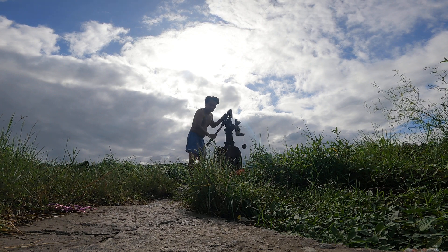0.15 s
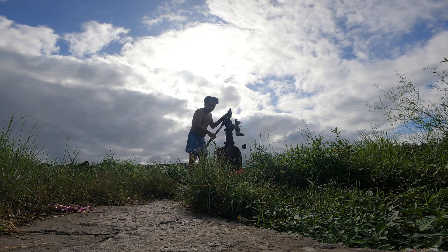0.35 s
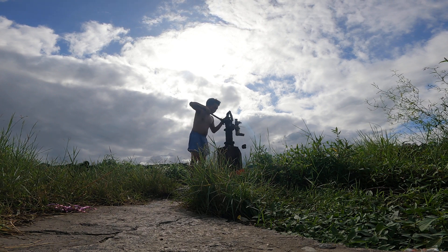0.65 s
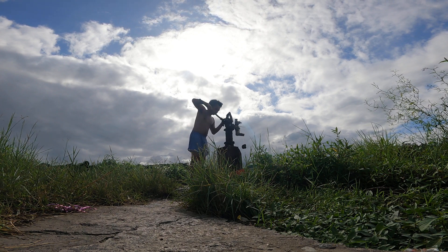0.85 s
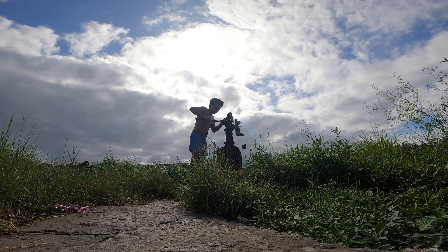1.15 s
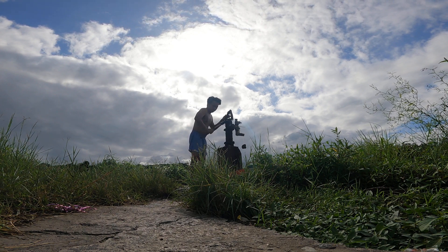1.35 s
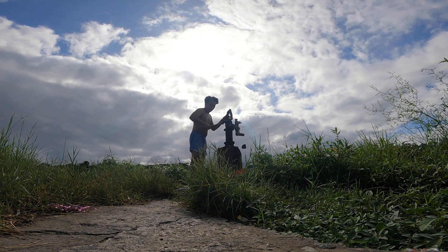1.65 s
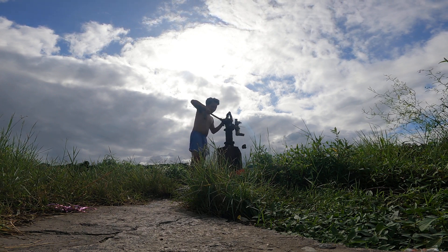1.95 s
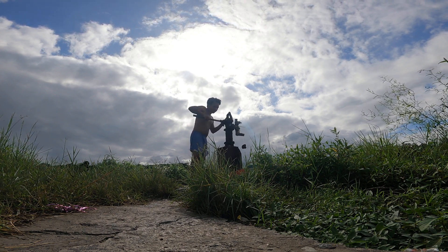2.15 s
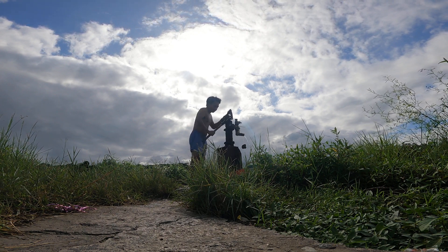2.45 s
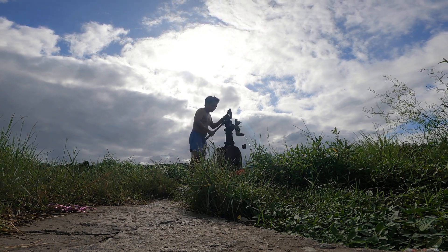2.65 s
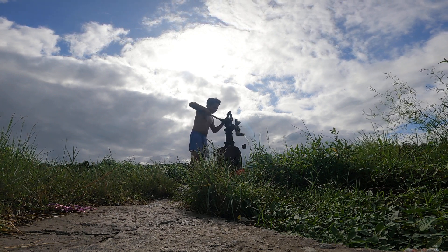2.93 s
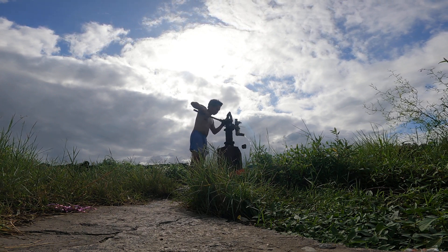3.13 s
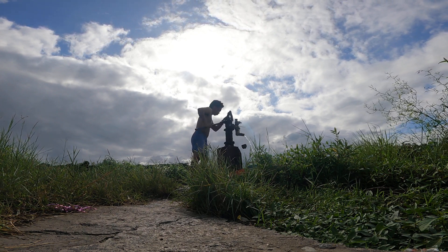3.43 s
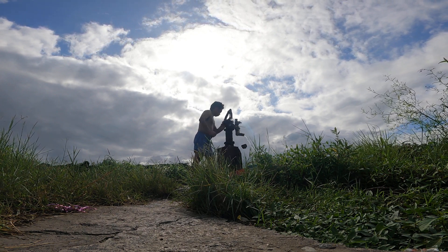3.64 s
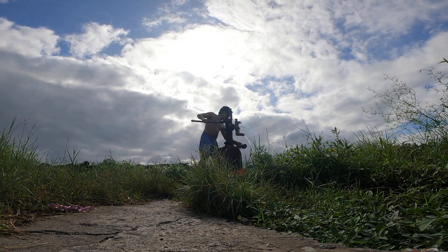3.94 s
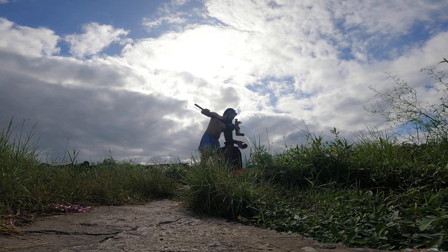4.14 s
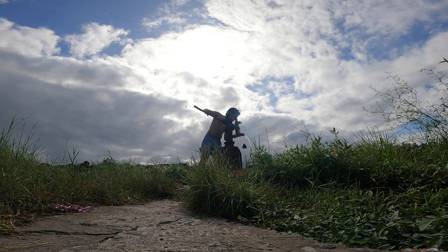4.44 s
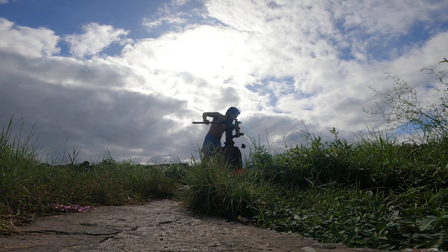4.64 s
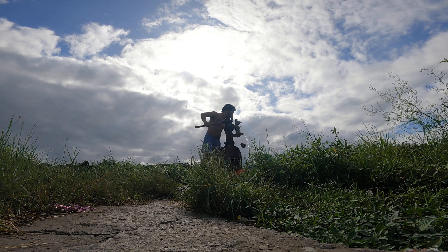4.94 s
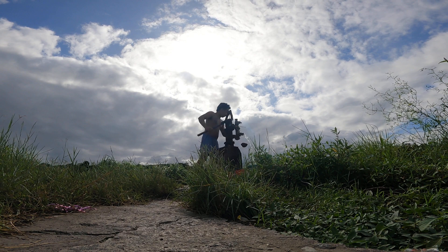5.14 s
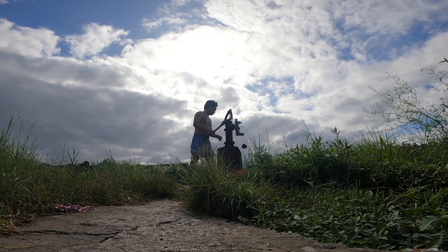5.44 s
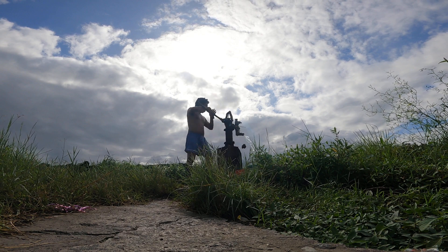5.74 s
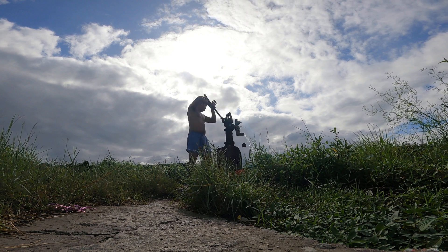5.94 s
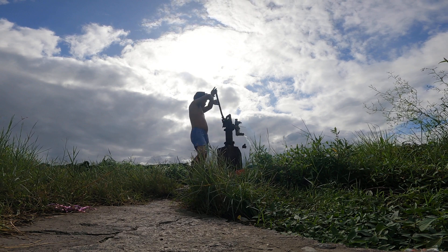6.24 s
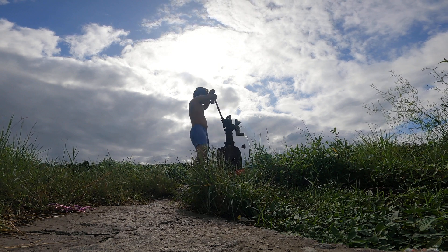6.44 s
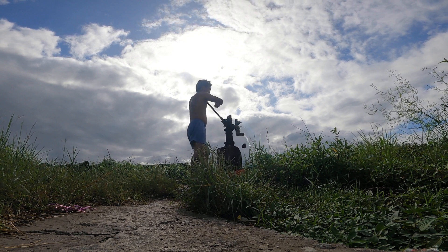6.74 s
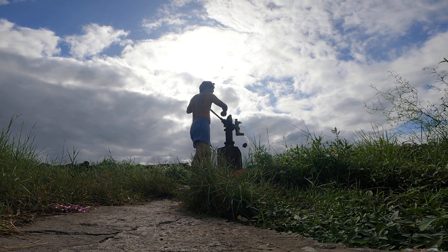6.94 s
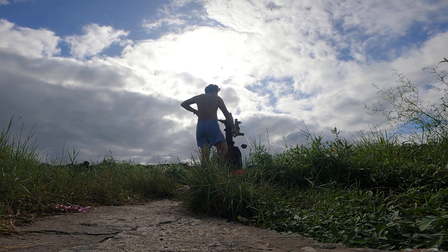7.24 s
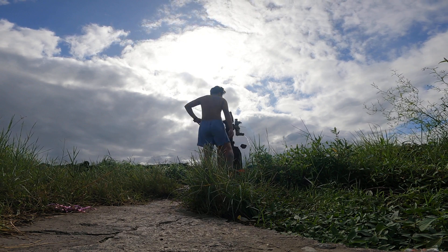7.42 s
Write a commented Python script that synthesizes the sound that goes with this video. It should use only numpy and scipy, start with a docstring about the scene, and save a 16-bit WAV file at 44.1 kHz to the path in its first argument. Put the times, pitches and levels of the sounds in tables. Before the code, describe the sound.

Metal knocks and short squeals from a hand pump lever, with hollow gulps, splashing water and a soft wind rumble.

```python
"""A worn cast-iron hand pump is worked in an open field, a few metres away, in a light rumbling wind.
From the first stroke its loose pivots knock, grind and squeal, and trapped air gulps in the barrel.
As the pump primes, water pours from the spout and splashes below; the biggest gulps come after 5 s.
The lever rests at about 7 s; the water runs on under one thin high chirp, like a small bird or insect."""
import sys
import numpy as np
from scipy import signal
from scipy.fft import rfft, irfft
from scipy.io import wavfile
from scipy.ndimage import uniform_filter1d

SR = 44100
rng = np.random.default_rng(int(sys.argv[2]) if len(sys.argv) > 2 else 0)


def bounce(signal):
    """Save signal as a 16-bit WAV file at the path given by the first command-line argument."""
    frames = np.transpose(np.atleast_2d(signal))
    limited = np.clip(frames, -1, 1)
    pcm = np.round(limited * 32767).astype(np.int16)
    wavfile.write(sys.argv[1], SR, pcm)


N = 334278
TIME, BINS = np.arange(N) / SR, np.fft.rfftfreq(N, 1 / SR)


# Hits of the lever and rod: start_s, level_db, chatter_t60_s
KNOCK_HITS = [(0.345, -17.5, 0.18), (0.35, -10, 0.059), (0.5987, -16, 0.071), (0.621, -11.5, 0.093),
              (0.6727, -12.5, .04), (0.7062, -18.5, 0.09), (1.1612, -7.5, 0.05), (1.1804, -20, 0.063),
              (1.2084, -16, .045), (1.6138, -12.5, 0.072), (1.624, -10, 0.066), (1.752, -20, 0.031),
              (1.7667, -11, 0.065), (1.79, -14.5, 0.076), (1.8018, -10, 0.18), (1.8643, -12.5, 0.04),
              (1.9558, -8.5, 0.11), (2.1217, -23.5, 0.053), (2.1844, -15.5, 0.033), (2.2223, -20.5, 0.19),
              (2.2652, -7.5, 0.089), (2.325, -19.5, 0.019), (2.3556, -15, 0.02), (2.3942, -21, 0.28),
              (2.6825, -9.5, 0.073), (2.7499, -19, 0.15), (2.8289, -16.5, 0.16), (2.852, -16.5, 0.04),
              (2.8731, -11.5, 0.021), (2.9035, -11, 0.056), (2.9901, -13, .11), (3.3167, -11, 0.053),
              (3.3807, -19, 0.029), (3.438, -15, 0.017), (3.9764, -11.5, 0.093), (4.0411, -11, 0.12),
              (4.123, -10.5, 0.052), (4.582, -14.5, 0.024), (4.6494, -24.5, 0.088), (4.672, -12, 0.046),
              (4.7325, -15, 0.1), (5.6354, -12, 0.21), (5.701, -12, 0.15), (5.822, -13, .07),
              (5.8493, -10.5, .08), (5.8693, -8, 0.013), (6.427, -18, 0.11), (6.5562, -19, 0.062),
              (6.5857, -13.5, 0.031), (6.9082, -21.5, .055)]
def knocks(level_db=-7, ring_db=-1, chatter_db=-2.5, strike=11, size=16384):
    """Play in the joints closes with a blow, then the parts chatter to rest."""
    out, t, hz = np.zeros(N), np.arange(size) / SR, np.fft.rfftfreq(size, 1 / SR)
    treble = np.clip((hz - 5000) / 1200, 0, 1)
    for start, db, t60 in KNOCK_HITS:
        contact = rng.standard_normal(size) * evened(amp(chatter_db * wander(460, size)))
        contact *= decay(t, t60)
        contact[0] += strike
        brightness = amp(0.22 * (db + 15.5) * treble)  # harder hits are brighter
        blow = irfft(rfft(contact) * rfft(iron(ring_db)) * brightness)
        add(out, start, amp(db + level_db) * peak_evened(blow))
    return out


# EQ of the clank: freq_hz, gain_db
CLANK_EQ = [(200, -7), (600, -15.5), (1000, -11), (1900, -12), (3000, -6), (4300, 5), (4850, 2),
            (5600, -20.5), (6650, 1), (7400, -9.5), (9500, -21), (12400, -22.5), (13200, -54), (15500, -34)]
# Ringing modes of the casting: pitch_hz, energy_db, t60_s
IRON_MODES = [(2445, -23, 0.069), (3562, -21, 0.42), (3674, -15.5, 0.055), (3900, -20.5, 0.067),
              (4190, -11, 0.082), (4360, -14, 0.027), (4540, -16, 0.033), (4730, -15, 0.048),
              (6470, -15, 0.035), (6734, -14, 0.24), (6590, -33.5, 0.3), (7780, -21, 0.052),
              (8180, -29, 0.099), (8883, -29.5, 0.4), (8840, -33, 0.1), (11670, -33, 0.16),
              (12600, -33.5, 0.3), (12730, -25, 0.27)]
def iron(ring_db, spot_hz=330, spot_db=6.0, size=16384):
    """The iron answers one contact: a clank of crowded, fast-dying modes, and a few that ring on."""
    t = np.arange(size) / SR
    clank = noise_burst(t, 0.021, CLANK_EQ)
    hz, db, t60 = np.transpose(IRON_MODES)[:, :, None]
    modes = np.sin(2 * np.pi * (hz * t + rng.random(hz.shape))) * decay(t, t60)
    modes *= amp(db + ring_db) / np.linalg.norm(modes, axis=1, keepdims=True)
    bands = np.arange(0, SR / 2, spot_hz)  # each spot of contact favours other pitches
    spot_eq = np.column_stack([bands, spot_db * rng.standard_normal(256)[:len(bands)]])
    return unit_energy(through(modes.sum(0) + unit_energy(clank), click(spot_eq))[:size])


# Strokes of the lever: start_s, length_s, force_db, peak_at_fraction
LEVER_STROKES = [(0.345, 0.53, -31.5, 0.64), (1.083, 0.17, -27, 0.57), (1.735, 0.31, -27.5, 0.12),
                 (2.126, .32, -34, 0.31), (2.677, 0.4, -25.5, 0.36), (3.26, 0.3, -31, 0.21),
                 (4.011, 0.21, -28.5, 0.34), (4.528, 0.3, -32, 0.68), (5.634, .25, -23.5, 0.35),
                 (6.206, 0.057, -30.5, .4), (6.397, 0.27, -30.5, 0.39), (6.855, .1, -32, 0.83)]
def lever_force(release_s, grip_s=0.0025, ends_db=-9.5):
    """Each stroke grips, builds to its hardest point, eases and lets go."""
    out = np.zeros(N)
    for start, length, db, peak_at in LEVER_STROKES:
        t = TIME - start
        arch_db = np.interp(t / length, [0, peak_at, 1], [ends_db, 0, ends_db])
        gate = np.exp(np.minimum(t, 0) / grip_s - np.maximum(t - length, 0) / release_s)
        out += amp(db + arch_db) * gate
    return out


def grinding(level_db=-2, idle_db=-63, slips_per_s=58, low_cut_hz=1900, spots=12):
    """Dry pivots stick and slip unevenly over a fine rub; each slip rings the iron."""
    load = lever_force(release_s=0.024) + amp(idle_db)  # faint ticking between strokes
    slip_count = np.floor(np.cumsum(slips_per_s * np.exp(.35 * wander(70, N))) / SR)
    slips = np.diff(slip_count, prepend=0) * amp(2 * wander(90, N))
    rub = evened(crackle(1800, 4.1)) * np.sqrt(load / load.max())  # heavy load brings up the scrape
    drive = load * (evened(slips) + 0.36 * rub)
    low_cut = signal.butter(1, low_cut_hz, "highpass", fs=SR)  # light contacts have little body
    drive = signal.lfilter(*low_cut, drive)
    spot = rng.integers(0, spots, N)[slip_count.astype(int)]  # the contact moves with every slip
    return amp(level_db) * sum(through(drive * (spot == k), iron(ring_db=5)) for k in range(spots))


# High-shelf ride on the iron: time_s, gain_db
SHEEN_RIDE = [(.5, 1), (2.3, -3.5), (2.85, 4.5), (3.6, -3), (4.6, -5), (7, -5.5)]
def sheen(x, shelf_hz=11300):
    """The iron's top end is brightest near 3 s and duller once the water runs."""
    top = irfft(rfft(x) / (1 + (shelf_hz / (BINS + 1)) ** 20), N)
    return x + top * (amp(ride(SHEEN_RIDE)) - 1)


# Pivot squeals, then in the last row a thin high chirp: start_s, length_s, pitch_hz, level_db
SQUEALS_AND_CHIRP = [(0.718, 0.031, 3640, -26.5), (0.999, 0.08, 3740, -52), (1.266, 0.02, 3480, -32),
                     (1.853, 0.17, 3630, -38), (2.12, 0.061, 3610, -31), (2.902, 0.078, 3562, -22),
                     (3.004, 0.24, 3560, -51.5), (5.792, 0.073, 3580, -27.5), (6.414, 0.044, 3600, -32),
                     (6.584, 0.043, 4230, -27), (7.158, 0.076, 7870, -37)]
# The lever at the top of its swing: start_s, length_s, pitch_hz, level_db
LEVER_CREAK = (6.165, .02, 1290, -35)
def squeals_and_chirp(level_db=2):
    """Friction locks into squeals and one reedy creak; last comes a chirp like a small bird or insect."""
    out = np.zeros(N)
    for start, length, hz, db in SQUEALS_AND_CHIRP:
        add(out, start, short_tone(length, hz, db, partials_db=[0, -38]))
    start, length, hz, db = LEVER_CREAK
    add(out, start, short_tone(length, hz, db, partials_db=[-1, -8, 5, -13]))
    return amp(level_db) * out


def short_tone(length, hz, db, partials_db, rough=0.15, waver=0.0052, fade=0.72):
    """A slightly rough tone holds one pitch for a moment, then cuts off."""
    t = np.arange(SR // 3) / SR
    phase = 2 * np.pi * np.cumsum(hz * (1 + waver * wander(410, len(t)))) / SR
    attack = 1 - np.exp(-t / 0.0041)
    fall = np.exp(-fade * t / length - np.maximum(t - length, 0) / 0.001)
    tone = sum(gain * np.sin(k * phase) for k, gain in enumerate(amp(partials_db), 1))
    return amp(db) * evened(tone) * attack * fall * (1 + rough * wander(456, len(t)))


# Gulps of trapped air: start_s, level_db, pitch_hz
AIR_GULPS = [(0.393, -25.5, 207.6), (0.734, -22, 207), (0.873, -24, 197.4), (0.914, -25.5, 205),
             (1.053, -27.5, 218), (1.212, -22.5, 218), (1.235, -18, 222), (1.8, -27.5, 216),
             (1.96, -27, 225.3), (2.364, -22, 227.4), (2.737, -32.5, 170.5), (3.203, -29, 175),
             (3.457, -23.5, 251), (3.712, -36, 403), (4.019, -26.5, 344), (4.764, -19, 369.6),
             (5.209, -18.5, 253), (5.274, -21.5, 262), (5.341, -15, 385), (5.341, -7.5, 282.6),
             (5.364, -11, 243.5), (5.403, -12.5, 270.3), (5.475, -18.5, 260), (6.92, -23.5, 229)]
# EQ of the plop: freq_hz, gain_db
PLOP_EQ = [(100, -28), (250, 9.5), (430, 2.5), (650, -1.5), (1200, -3), (3000, -22), (15000, -62)]
def gulps(level_db=-2, sag=0.15, t60_cycles=52.6, plop_db=-13, plop_t60=0.071):
    """An air pocket plops loose and rings low; its pitch sags and wobbles as the cavity opens."""
    out, t = np.zeros(N), np.arange(SR // 3) / SR
    for start, db, hz in AIR_GULPS:
        pitch = hz * (1 + sag * np.exp(-t / 0.0012) + 0.035 * wander(80.4, len(t)))
        envelope = (1 - np.exp(-t / 0.0013)) * decay(t, t60_cycles / hz)
        ring = envelope * np.sin(2 * np.pi * np.cumsum(pitch) / SR)
        plop = noise_burst(t, plop_t60, PLOP_EQ)
        add(out, start, amp(db + level_db) * (ring + amp(plop_db) * plop))
    return out


# Slaps of falling water: start_s, level_db, centre_hz
WATER_SLAPS = [(3.464, -23.5, 2330), (3.871, -26, 1840), (4.26, -30, 2240), (4.801, -29.5, 910),
               (4.975, -30.5, 1800), (5.174, -25, 1680), (5.193, -21.5, 122), (5.207, -25, 1660),
               (5.238, -24, 1150), (5.341, -22.5, 1660), (5.379, -23, 2060), (5.403, -22, 1180),
               (5.47, -23.5, 1040), (7.091, -33, 1890), (7.324, -25.5, 1230), (7.39, -30, 1800)]
def slaps(level_db=-5, t60=0.032):
    """Lumps of water land with a short wet smack."""
    out, t = np.zeros(N), np.arange(4096) / SR
    for start, db, hz in WATER_SLAPS:
        eq = [(hz / 4, -22), (hz * 0.69, -7), (hz, 0), (hz * 1.76, -9), (hz * 4, -22), (15000, -44)]
        add(out, start, amp(db + level_db) * peak_evened(noise_burst(t, t60, eq)))
    return out


# Steady flow, building as the pump primes: time_s, level_db
POUR_RIDE = [(0, -63), (2.6, -54.5), (3.7, -52), (5.08, -48), (5.37, -47.5), (5.58, -45), (6.35, -48.5),
             (6.5, -38), (6.62, -46.5), (7.58, -49)]
def water(splash_surge_db=-32.5, churn_surge_db=-25, churn_steady_db=1, lag_s=0.0073, follow=0.49):
    """Splash and churn ride a steady flow, plus a surge that trails each stroke."""
    steady = amp(ride(POUR_RIDE))
    surge = np.interp(TIME - lag_s, TIME, lever_force(release_s=0.012)) ** follow
    splash_gain = np.hypot(steady, amp(splash_surge_db) * surge)
    churn_gain = np.hypot(amp(churn_steady_db) * steady, amp(churn_surge_db) * surge)
    return splash() * splash_gain + churn() * churn_gain


# EQ of falling water: freq_hz, gain_db
SPLASH_EQ = [(240, -35), (420, 0), (720, -13.5), (1100, -5.5), (1800, -9.5), (3700, -12.5), (6200, -13),
             (9000, -26), (12000, -28), (15500, -60)]
def splash(spray_db=-1, clump_db=6.5, drops_per_s=420, drop_t60=0.034, bands=24):
    """Fine spray lands in clumps under the spout; drops burst as puffs, each around its own pitch."""
    spray = through(crackle(5000, 3.4) * amp(clump_db * wander(70, N)), click(SPLASH_EQ))
    drops, t = np.zeros(N), np.arange(2048) / SR
    for hz in np.geomspace(600, 8000, bands):
        band = signal.butter(2, [hz / 1.2, hz * 1.22], "bandpass", fs=SR, output="sos")
        puff = signal.sosfilt(band, rng.standard_normal(len(t)) * decay(t, drop_t60))
        gain = amp(curve_at(SPLASH_EQ, hz)) * np.sqrt(hz)
        drops += gain * through(crackle(drops_per_s / bands, 4.46), evened(puff))
    return amp(spray_db) * evened(spray) + evened(drops)


# EQ of the gurgle: freq_hz, gain_db
GURGLE_EQ = [(50, -6), (110, 2.5), (210, 7), (330, -17), (480, -14.5), (900, -32.5)]
# Note of the air above the water: time_s, pitch_hz
BARREL_PITCH = [(.5, 206), (2.3, 246), (2.9, 372), (5.8, 290), (7, 220)]
def churn(gurgle_db=-1, hollow_db=-8, width_hz=110):
    """Water churns in the barrel; the air above rings higher as it fills, then the note sinks back."""
    gurgle = evened(through(crackle(260, 5.3), click(GURGLE_EQ)))
    pitch = ride(BARREL_PITCH)
    hollow = resonate(crackle(260, 1.1), pitch, width_hz)
    hollow = resonate(hollow, pitch, width_hz)
    return amp(gurgle_db) * gurgle + amp(hollow_db) * evened(hollow)


# EQ of the air over the field: freq_hz, gain_db
WIND_EQ = [(20, -19), (55, -4), (110, -3), (300, -23), (700, -37), (2000, -91), (4300, -30), (8000, -84),
           (15000, -72)]
# Gusts in the low end: time_s, level_db
GUST_RIDE = [(0, -48.5), (.5, -46), (1.15, -44.5), (1.3, -37.5), (1.5, -45.5), (3.4, -45.5), (3.7, -50),
             (5.1, -44), (5.21, -45.5), (7.58, -51)]
def wind(bed_db=-47, gust_db=2, crossover_hz=170):
    """Lumpy gusts rumble on the microphone under a steady bed of air."""
    shared, left, right = rfft(rng.standard_normal((3, N))) * amp(curve_at(WIND_EQ, BINS))
    air = shared + np.array([left, right]) / (1 + BINS / 18)  # only the deepest rumble is wide
    low = 1 / (1 + (BINS / crossover_hz) ** 4)
    lumps = amp(2.5 * wander(12, N))
    rumble = amp(ride(GUST_RIDE) + gust_db) * lumps * irfft(air * low, N)
    bed = amp(bed_db) * irfft(air * (1 - low), N)
    return (rumble + bed) / np.std(irfft(air, N))


def field(x, scatter_db=-23, t60=0.2, predelay_s=0.006):
    """Grass and bushes scatter a faint short tail back."""
    t = np.arange(SR // 3) / SR
    tails = rng.standard_normal((2, len(t))) * decay(t, t60) * (t > predelay_s)
    return x + amp(scatter_db) * np.array([through(x, unit_energy(tail)) for tail in tails])


def amp(db):
    return 10 ** (np.asarray(db) / 20)


def decay(t, t60):
    return np.exp(-np.log(1000) * t / t60)


def evened(x):
    """Scaled to rms 1."""
    return x / np.sqrt(np.mean(x ** 2) + 1e-20)


def peak_evened(x):
    """Scaled to rms 1 over its loudest 4 ms."""
    return x / np.sqrt(uniform_filter1d(x ** 2, size=180).max())


def unit_energy(x):
    return x / np.linalg.norm(x)


def ride(points):
    return np.interp(TIME, *np.transpose(points))


def curve_at(points, hz):
    freqs, values = np.transpose(points)
    return np.interp(np.log(hz + 1), np.log(freqs + 1), values)


def add(mix, start_s, sound):
    part = mix[round(start_s * SR):][:len(sound)]
    part += sound[:len(part)]


def through(x, response):
    return signal.oaconvolve(x, response)[:N]


def wander(per_s, size):
    """Smooth random drift of rms 1."""
    at = np.arange(size) * per_s / SR
    return evened(np.interp(at, np.arange(4096), rng.standard_normal(4096)))


def click(eq, size=2048):
    """A minimum-phase click with the given EQ."""
    log_gain = np.log(amp(curve_at(eq, abs(np.fft.fftfreq(size, 1 / SR)))))
    return unit_energy(np.fft.ifft(np.exp(np.conj(signal.hilbert(log_gain)))).real)


def noise_burst(t, t60, eq):
    return through(rng.standard_normal(len(t)) * decay(t, t60), click(eq))[:len(t)]


def crackle(per_s, spread_db):
    """Random impulses, a few of them large."""
    sizes = amp(spread_db * np.minimum(rng.exponential(1, N), 3.5)) * rng.choice([-1, 1], N)
    return sizes * (rng.random(N) < per_s / SR)


def resonate(x, hz, width_hz):
    """A swept resonance: shift hz down to zero, smooth, shift back."""
    carrier = np.exp(2j * np.pi * np.cumsum(hz) / SR)
    pole = np.exp(-np.pi * width_hz / SR)
    return 2 * (carrier * signal.lfilter([1 - pole], [1, -pole], x / carrier)).real


def scene():
    """Iron and water stand at one spot; the wind is all around."""
    metal = sheen(knocks() + grinding())
    return field(metal + squeals_and_chirp() + gulps() + slaps() + water()) + wind()


# Stereo balance: freq_hz, left_minus_right_db
MIC_BALANCE = [(100, -0.5), (1300, -1.5), (4500, -0.5), (9000, 0), (12500, -3)]
# Stereo phase: freq_hz, left_lead_rad
MIC_PHASE = [(300, 0), (500, -.25), (1100, -.48), (2500, -.66), (5000, -.5), (9000, -.55), (12500, 1.5)]
def record(dry, high_cut_hz=15200):
    """Two close microphone ports differ in level and phase; a steep high cut follows."""
    half = amp(curve_at(MIC_BALANCE, BINS) / 2) * np.exp(.5j * curve_at(MIC_PHASE, BINS))
    ports = irfft(rfft(dry) * np.array([half, 1 / half]), N)
    high_cut = signal.firwin(511, high_cut_hz, window=("kaiser", 9), fs=SR)
    return signal.oaconvolve(ports, high_cut[None], "same")


dry = scene()
out = record(dry)
bounce(out)
```